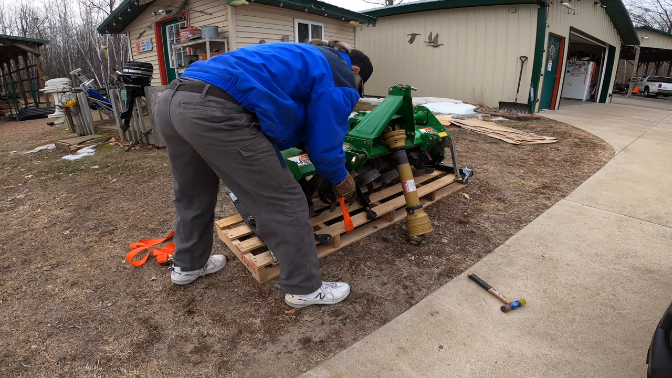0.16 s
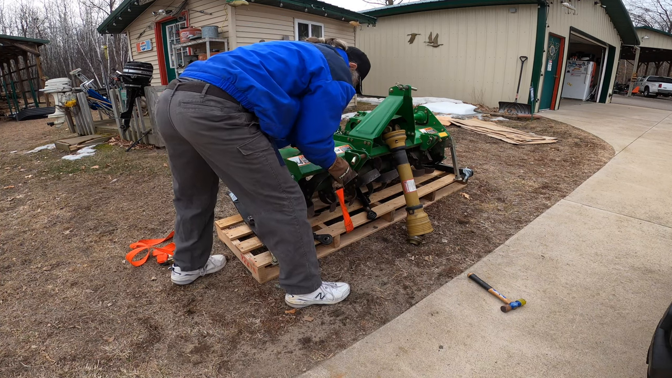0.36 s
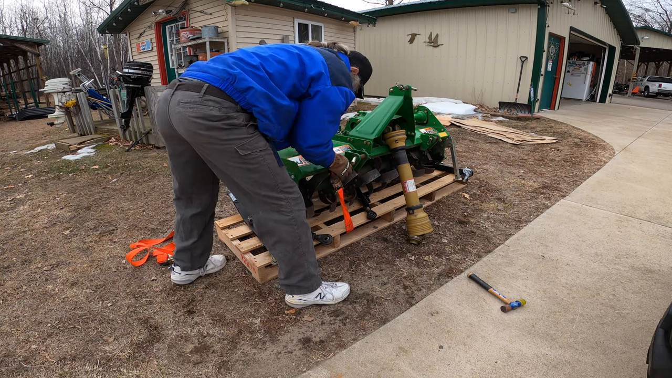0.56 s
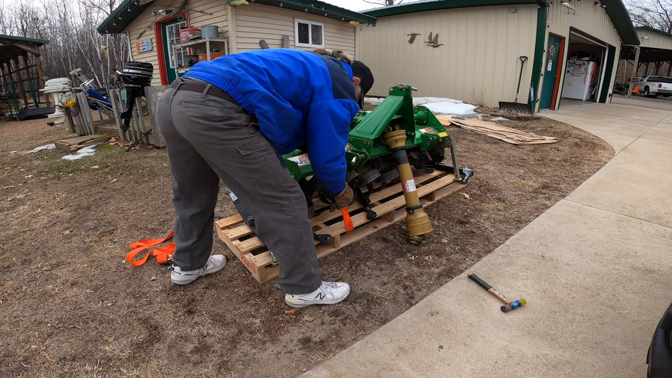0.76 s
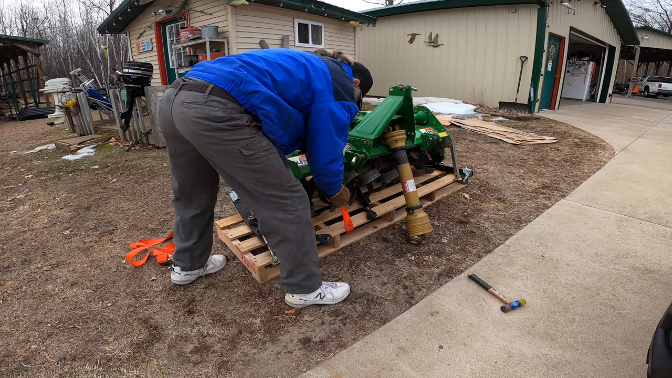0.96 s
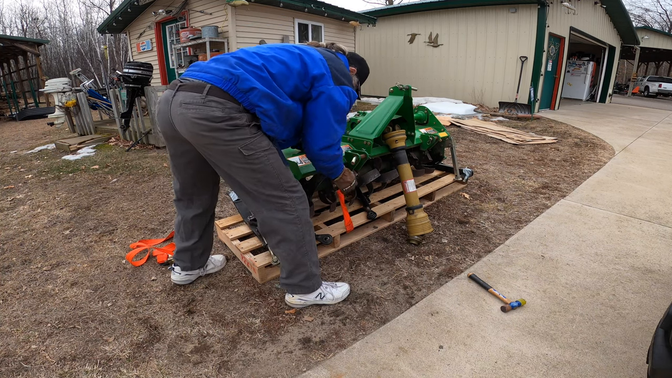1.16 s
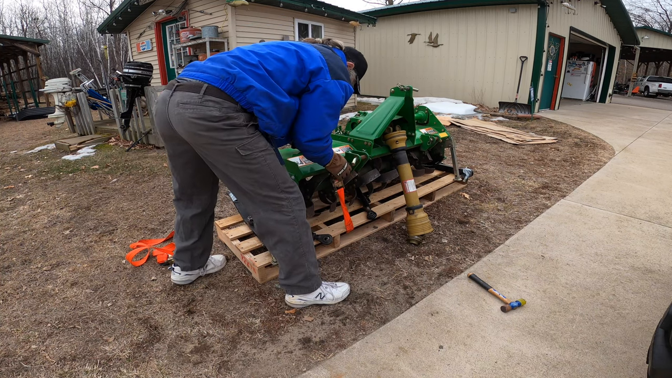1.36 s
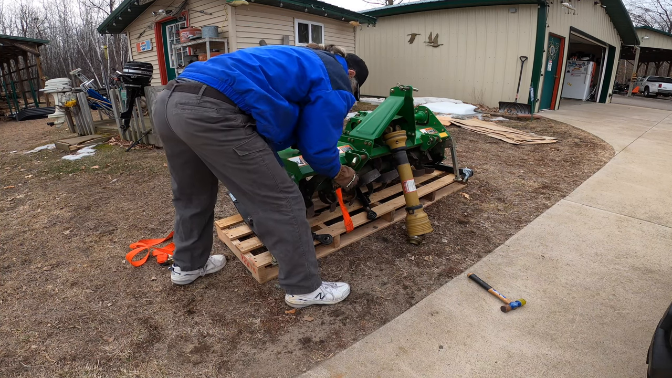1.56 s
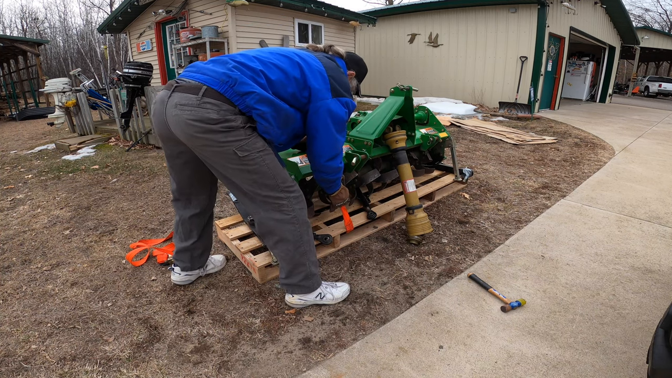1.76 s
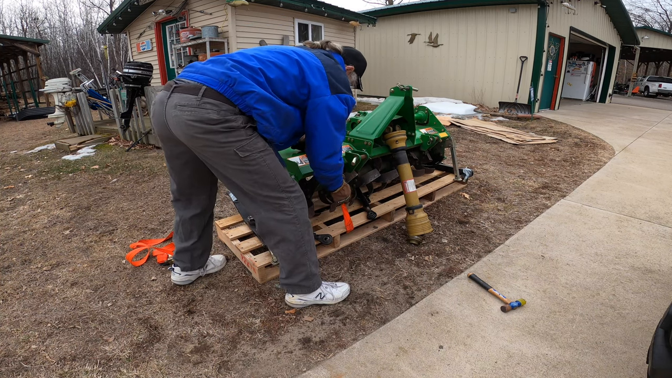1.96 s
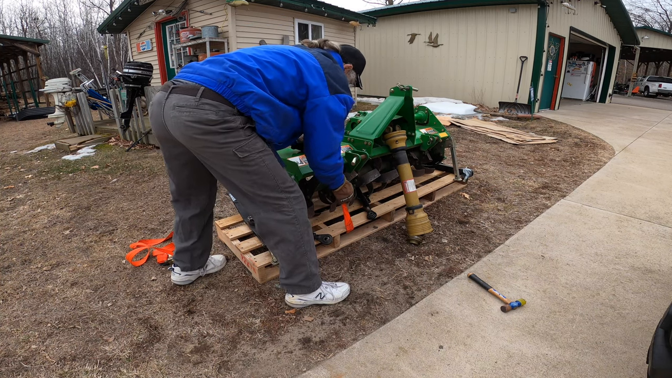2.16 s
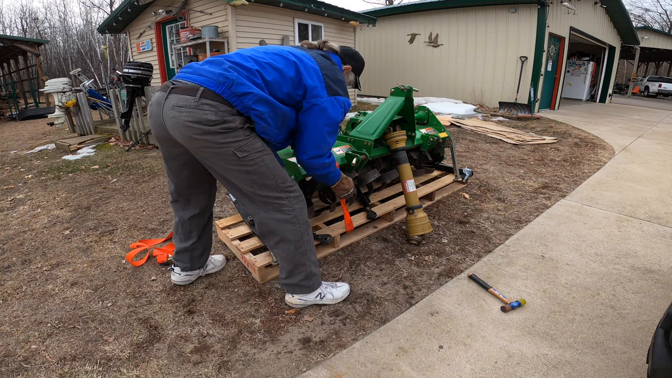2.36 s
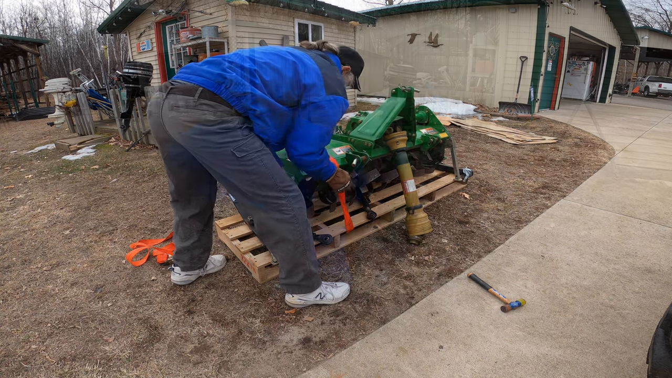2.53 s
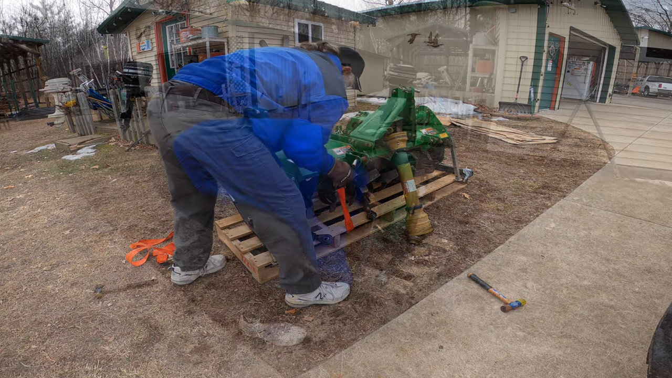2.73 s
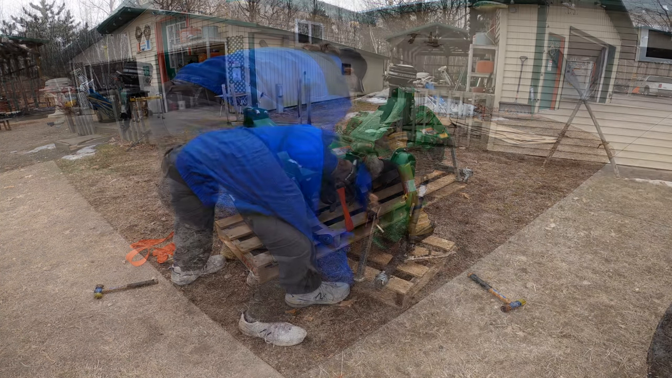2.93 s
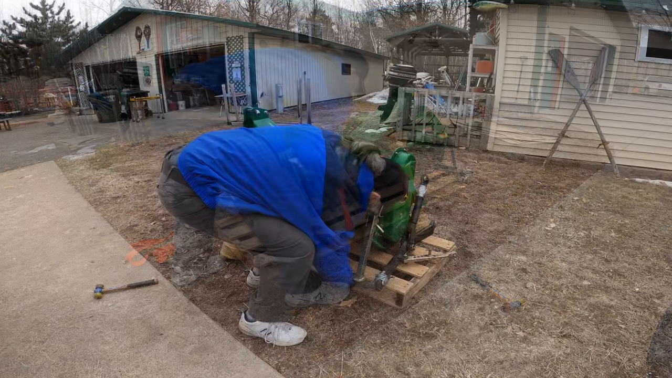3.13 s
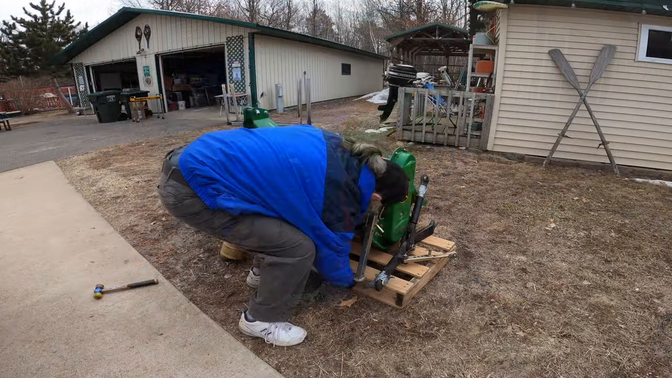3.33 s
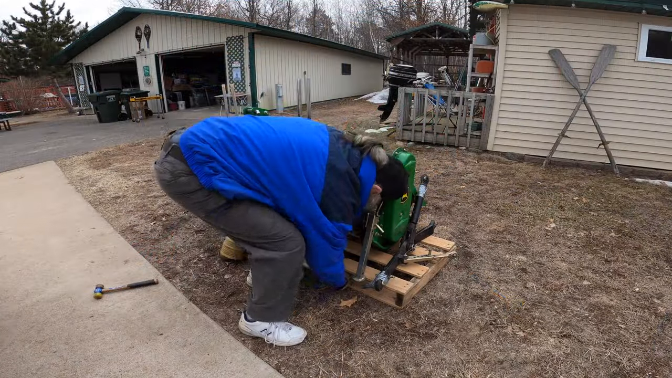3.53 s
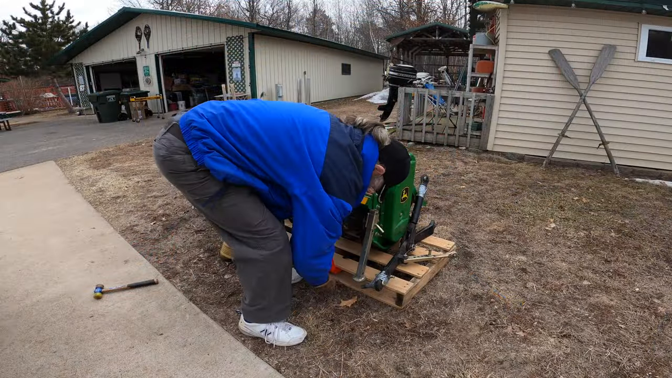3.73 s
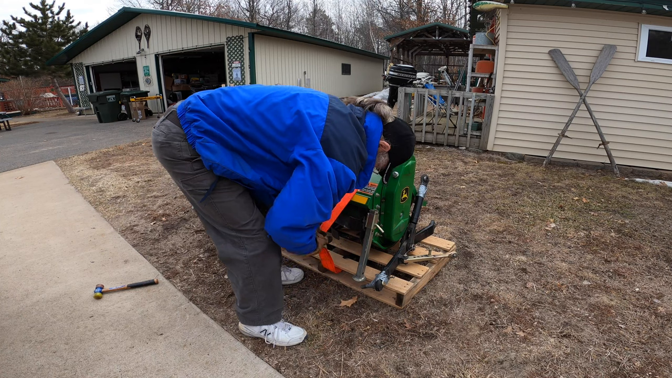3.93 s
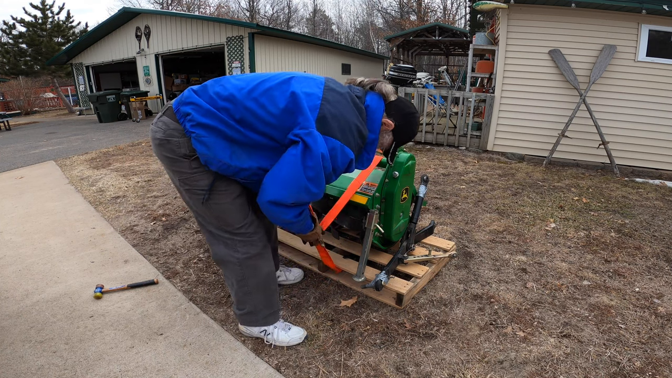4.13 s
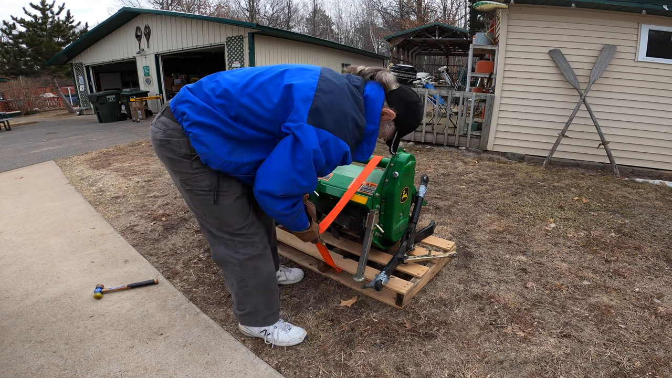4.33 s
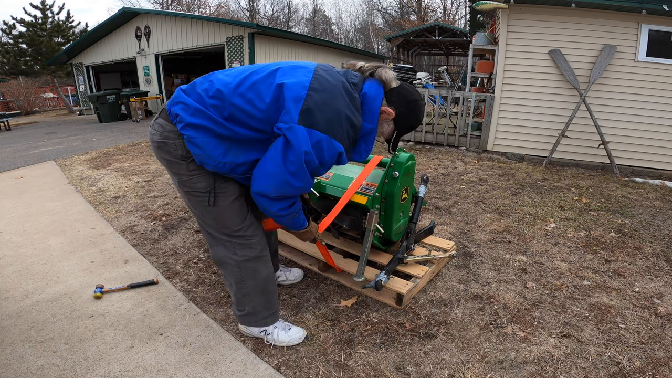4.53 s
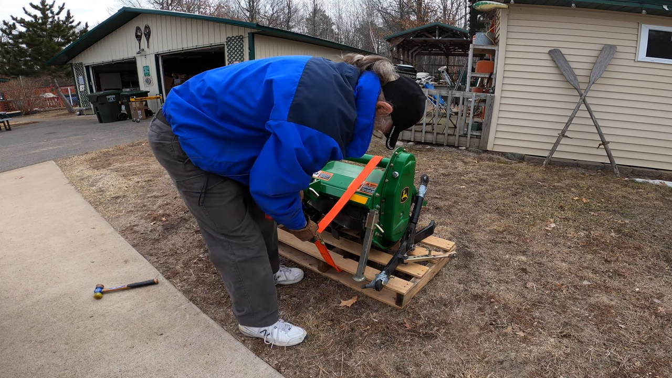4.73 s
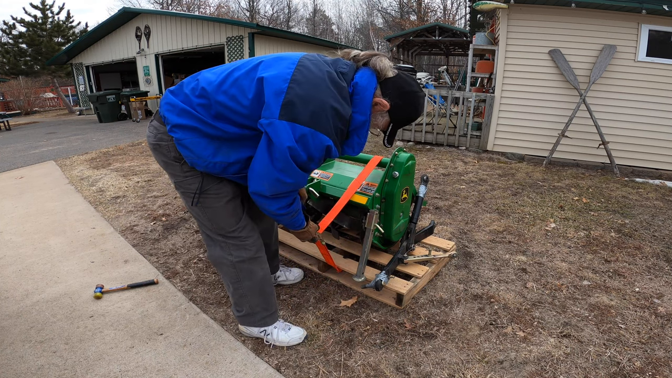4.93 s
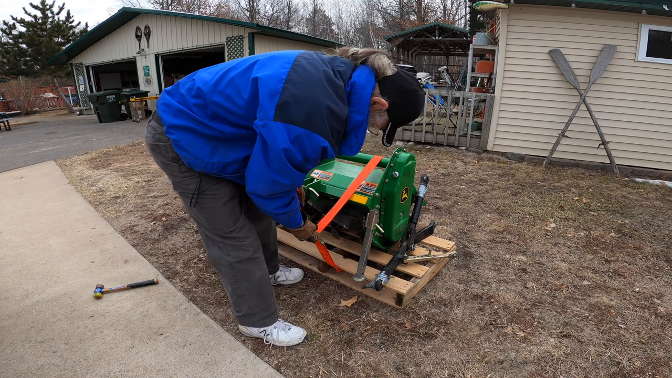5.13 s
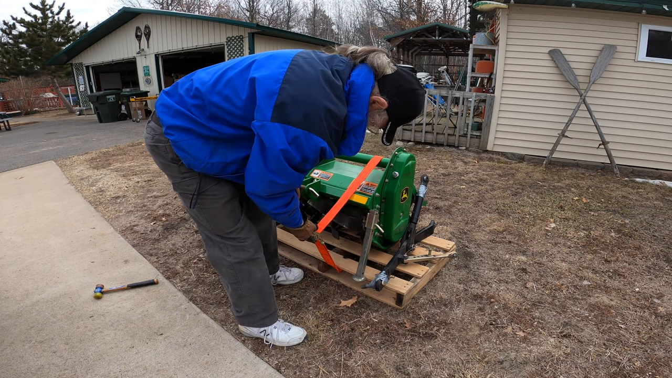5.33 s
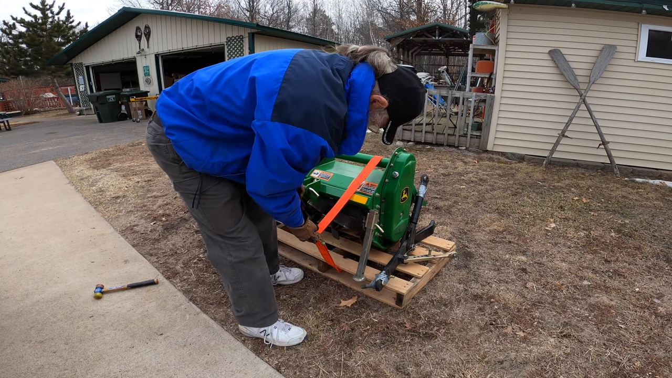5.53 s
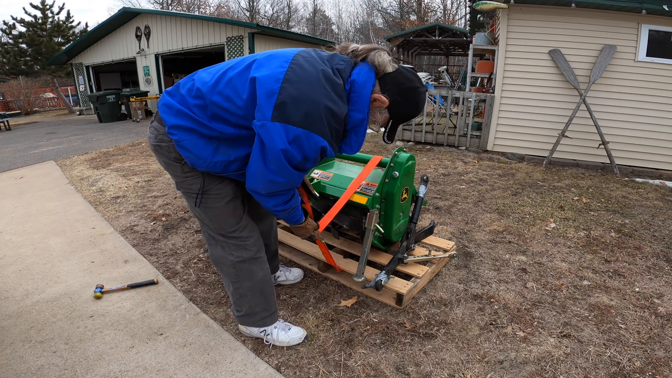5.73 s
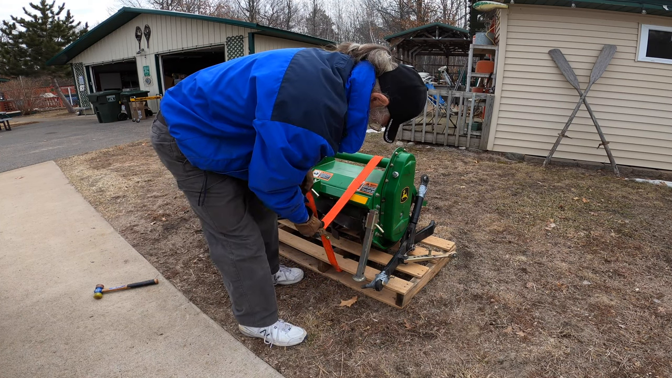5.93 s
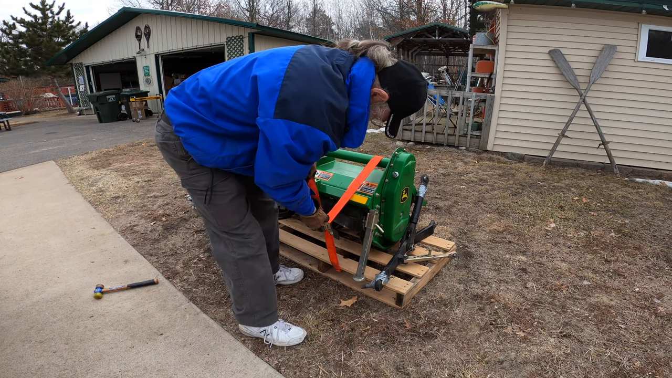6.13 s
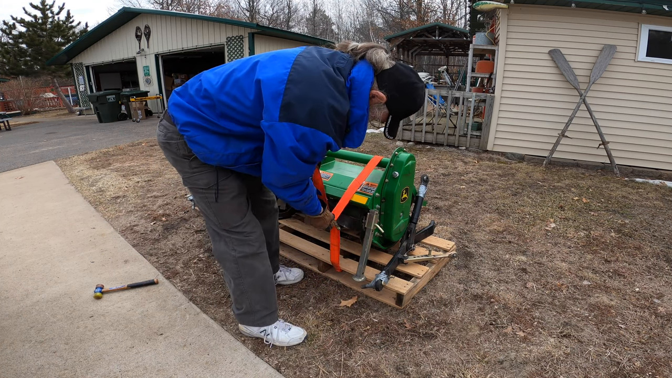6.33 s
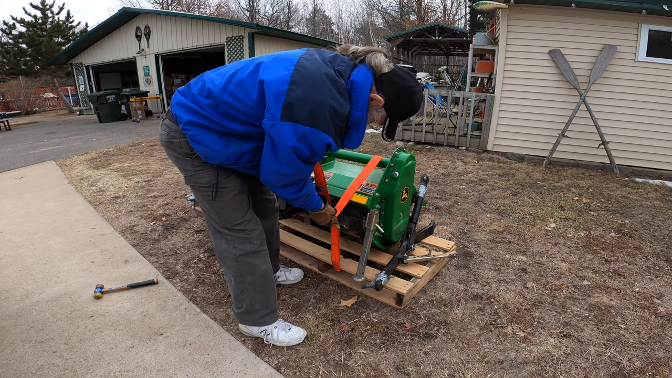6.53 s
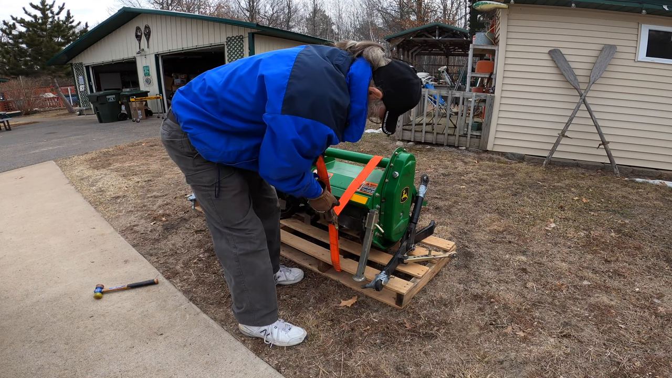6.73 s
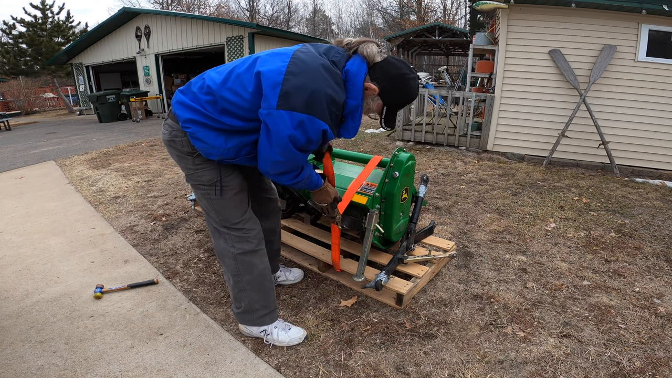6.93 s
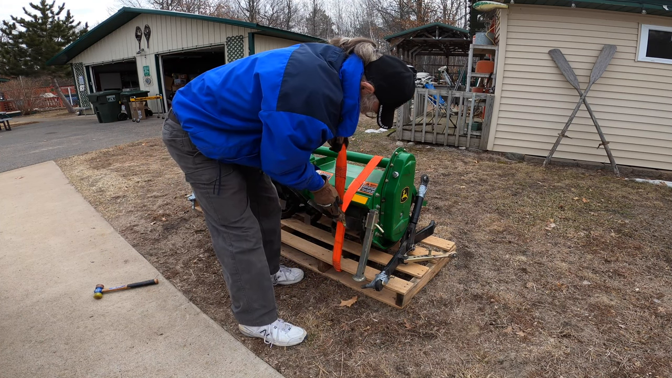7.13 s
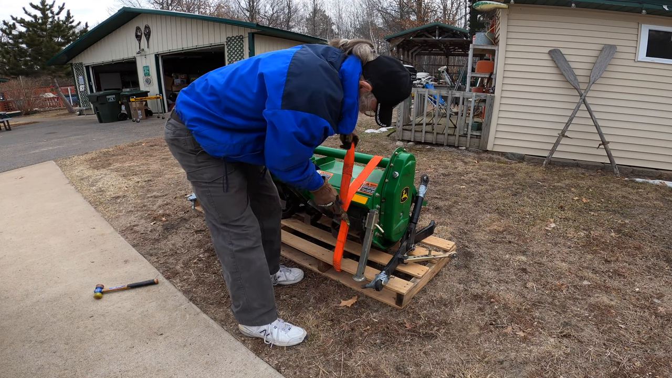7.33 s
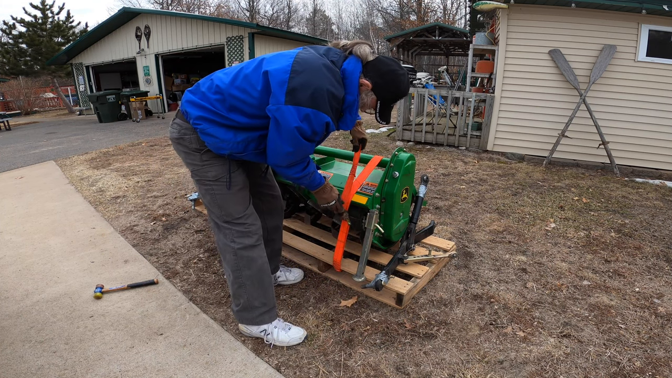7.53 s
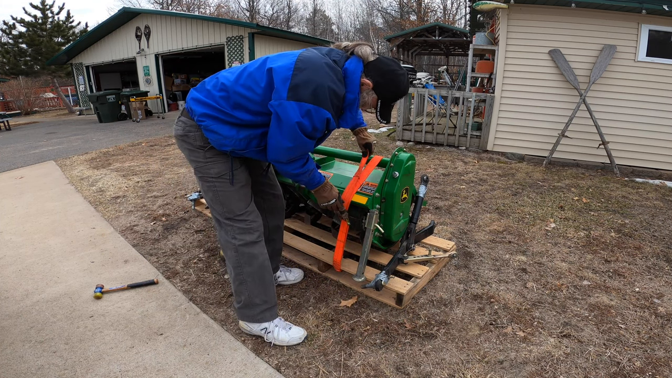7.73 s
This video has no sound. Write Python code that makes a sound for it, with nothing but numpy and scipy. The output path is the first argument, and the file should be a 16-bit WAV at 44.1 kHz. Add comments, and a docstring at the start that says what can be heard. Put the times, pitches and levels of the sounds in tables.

```python
"""Ratchet on a strap, outdoors

A steel ratchet is cranked: noise bursts ring body and pawl-spring modes, clinks ring the loose handle,
tick-modulated grit is the dragging pawl; decaying noise tails are the walls. Shaped noise makes wind buffets,
far engine drone, broad rush, hiss, jacket rustle and pallet knocks; gliding sines make engine notes, birdsong,
a low falling tone and a thin rough tone near the end. Stereo fades to mono just after 3 s, as the hiss stops."""
import sys
import numpy as np
from scipy import signal
from scipy.fft import rfft, irfft, next_fast_len
from scipy.io import wavfile
from scipy.ndimage import uniform_filter1d, map_coordinates

SR = 44100
rng = np.random.default_rng(int(sys.argv[2]) if len(sys.argv) > 2 else 0)


def unload_wav(signal):
    """Save mono or channel-first audio to the path in sys.argv[1] as 16-bit WAV at rate SR, clipped to [-1, 1]."""
    wavfile.write(
        sys.argv[1],
        SR,
        np.round(np.clip(np.atleast_2d(signal).T, -1, 1) * 32767).astype(np.int16),
    )


N = 343098
MONO_FROM_S = 3.043

# wind and engines over time: t/s, buffet level/dB, drone level/dB
WIND_AND_DRONE = [(0, -47.5, -58.5), (.5, -57, -63.5), (.62, -45.5, -52.5), (.95, -52.5, -63.5),
                  (1.41, -46.5, -54), (1.48, -49, -69), (1.6, -37, -58), (2.1, -73, -64), (2.8, -58, -60.5),
                  (3.5, -46.5, -52), (3.8, -42.5, -47), (4.25, -51.5, -53.5), (4.8, -47.5, -52),
                  (5.85, -51.5, -61.5), (6.37, -57, -59), (7.0, -54.5, -59), (7.78, -53, -54.5)]
# pawl snaps and scuffs: t/s, level/dB, treble/dB, bass/dB, burst t60/s
SNAPS = [(.0216, -36, -10, -4.5, 0.057), (.1562, -27.5, -7.5, -28, 0.029), (.1782, -15, -1.5, -6.5, 0.042),
         (.264, -35, -12, -2, .033), (.3069, -28, -8, -3, .017), (.3229, -13.5, -1, -8.5, 0.048),
         (.4087, -31, -2.5, -31, .09), (.4361, -13, -5.5, -8.5, 0.052), (.6853, -34.5, 2.5, -40, 0.062),
         (.6915, -31.5, -21, -23, .066), (.7659, -18.5, 0.5, -40, 0.04), (.8157, -15, -5, -18, 0.042),
         (1.0357, -35, -9.5, -5.5, 0.03), (1.0891, -31.5, -12, -14.5, 0.062),
         (1.1155, -22.5, -11, -8.5, 0.078), (1.2066, -34, -30, -0.5, 0.099), (1.2335, -23, -11, -19, 0.058),
         (1.2522, -12, -3, -14, 0.033), (1.3016, -24.5, -8, -2, .064), (1.3405, -25.5, -7, -21, 0.028),
         (1.3559, -9.5, -7, -20, 0.031), (1.5448, -29.5, -4.5, -15, .081), (1.553, -27.5, -27, -2, 0.13),
         (1.576, -34, -15, -1, 0.065), (1.6695, -38.5, -10, -10, 0.021), (1.709, -14.5, -6, -22, 0.044),
         (1.764, -13, -7, -24.5, 0.034), (1.8309, -19.5, -6.5, -15.5, 0.046),
         (2.3895, -31, -8, -37.5, 0.071), (2.416, -12, -9.5, -21.5, 0.034),
         (2.5495, -33.5, -15.5, -40, .028), (2.5665, -32.5, -9.5, -31, .052),
         (2.602, -10.5, -8.5, -14.5, 0.038), (2.8137, -35.5, -18, -35, .04), (2.849, -15, -9, -44, .019),
         (2.8555, -16.5, -13, -13.5, 0.018), (3.318, -49.5, 0, -2, 0.016)]
# ratchet body modes: f/Hz, level/dB, t60/s
BODY_MODES = [(360.8, -11, 0.19), (604, -14.5, 0.18), (761, -9.5, 0.11), (1050, 0, 0.047), (1632, -9, 0.08),
              (2100, -15.5, 0.084), (2430, -19.5, 0.091), (2740, -37, .03), (3070, -6, .035),
              (3415, -5, 0.07), (3520, 1.5, 0.025), (4070, -23, 0.12), (5010, -36.5, 0.034)]


def amp(db):
    """Decibels to gain."""
    return 10 ** (np.asarray(db) / 20)


def unit(x):
    """Scale to rms 1."""
    return x / np.sqrt(np.mean(x ** 2) + 1e-20)


def along(points, hz):
    """Interpolate (f/Hz, value) points on a log frequency axis."""
    f, v = np.transpose(points)
    return np.interp(np.log(hz + 1), np.log(f + 1), v)


def curves(rows):
    """One value per sample for each column after the time."""
    s, *cols = np.transpose(rows)
    return [np.interp(np.arange(N) / SR, s, c) for c in cols]


def wobble(knots_per_s):
    """Smooth random curve through normally distributed knots."""
    knots = rng.standard_normal(int(N * knots_per_s / SR) + 4)
    return map_coordinates(knots, [np.arange(N) * knots_per_s / SR])


def filtered(x, response):
    """Multiply the spectrum of x by a complex response of frequency."""
    m = next_fast_len(x.shape[-1] + 4096)
    spectrum = rfft(x, m) * response(np.fft.rfftfreq(m, 1 / SR))
    return irfft(spectrum, m)[..., :x.shape[-1]]


def swells(rows, sharp):
    """Gains of sine-arch gestures, powers summed, per level column of (start/s, length/s, level/dB, ..)."""
    s, length, *cols = np.transpose(rows)[..., None]
    progress = np.clip((np.arange(N) / SR - s) / length, 0, 1)
    arch_power = np.sin(np.pi * progress) ** (2 * sharp)
    return [np.sqrt(np.abs(np.sum(arch_power * amp(2 * db), axis=0))) for db in cols]


def rush(spectrum, side_db, patchy_db):
    """Noise, patchy in time and frequency: mid of rms 1, side of rms side_db."""
    z = signal.stft(rng.standard_normal((2, N)), nperseg=512)[2]
    patches = uniform_filter1d(rng.standard_normal(z.shape[1:]), size=6, axis=0)
    patches = unit(uniform_filter1d(patches, size=10, axis=1))
    pair = signal.istft(z * amp(patchy_db * patches), nperseg=512)[1][:, :N]
    mid, side = filtered(pair, lambda hz: amp(along(spectrum, hz)))
    return np.array([unit(mid), amp(side_db) * unit(side)])


def grit(spectrum, scatter_db):
    """Dense tiny ticks of uneven size, coloured; rms 1."""
    ticks = rng.standard_normal(N) * amp(scatter_db * wobble(900))
    return unit(filtered(ticks, lambda hz: amp(along(spectrum, hz))))


def arcs(rows, ends_db):
    """Note rows to (t/s, f/Hz, level/dB) tables: parabolic pitch, level ends_db at both ends re middle."""
    u = np.linspace(-1, 1, num=9)
    notes = []
    for s, length, first, mid, last, db in rows:
        hz = mid + (last - first) / 2 * u + ((first + last) / 2 - mid) * u * u
        notes.append(np.transpose([s + length * (u + 1) / 2, hz, db + ends_db * u * u]))
    return notes


def whistle(notes, jitter, flutter_db, edge_s):
    """Gliding sines with unsteady pitch and level, each fading in and out over edge_s."""
    out, shake, flutter = np.zeros(N), wobble(1 / edge_s), wobble(0.73 / edge_s)
    for note in notes:
        s, hz, db = np.transpose(note)
        i = np.arange(round(s[0] * SR), min(round(s[-1] * SR), N))
        t = i / SR
        fade = np.clip(np.minimum(t - s[0], s[-1] - t) / edge_s, 0, 1)
        phase = 2 * np.pi * np.cumsum(np.interp(t, s, hz) * (1 + jitter * shake[i])) / SR
        level = amp(np.interp(t, s, db) + flutter_db * flutter[i])
        out[i] += np.sqrt(2) * fade * level * np.sin(phase)
    return out


def walls(x, delay_s, slap_db):
    """Two diffuse answers with frequency-dependent decay and a later lump from the far wall."""
    # wall decay: f/Hz, t60/s
    decay = [(250, 0.39), (1500, 0.22), (4000, 0.22), (9000, 0.13), (15000, 0.16)]
    hz, t, z = signal.stft(rng.standard_normal((2, SR // 3)), SR, nperseg=256)
    lump = 1 + amp(slap_db) * np.exp(-((t - .045) / .018) ** 2)
    fall = amp(-60 * t / along(decay, hz)[:, None])
    tail = signal.istft(z * lump * fall, SR, nperseg=256)[1]
    tail = np.pad(tail / np.linalg.norm(tail[0]), [(0, 0), (round(abs(delay_s) * SR), 0)])
    return signal.fftconvolve(x[None], tail, axes=1)


def wind():
    """Turbulence at the microphone: low noise with gusts, differing from port to port; mid and side."""
    # buffet spectrum: f/Hz, level/dB
    buffet_spectrum = [(7.1, -31.5), (12, 4), (32, 2), (69, 3), (200, -26.5), (260, -50), (440, -120)]
    # puffs on the ports: start/s, length/s, level/dB
    gusts = [(.02, 0.16, -40), (.39, 0.13, -51), (.58, 0.087, -35), (.68, 0.18, -46), (1.33, 0.088, -38.5),
             (1.53, 0.13, -35.5), (2.24, 0.074, -49), (2.72, 0.095, -48.5), (3.62, 0.19, -35),
             (3.8, 0.39, -43.5), (4.4, 0.16, -45), (4.93, 0.15, -37.5), (5.35, 0.33, -46.5),
             (6.0, 0.054, -40), (6.09, .1, -41)]
    buffet = amp(curves(WIND_AND_DRONE)[0])  # slowly varying buffet level
    gain = np.hypot(buffet, swells(gusts, sharp=1.1)[0]) * amp(1.5 * wobble(14))
    return gain * rush(buffet_spectrum, side_db=2.5, patchy_db=.8)


def engine_drone():
    """Far engines merged into low, nearly mono noise; mid and side."""
    # drone spectrum: f/Hz, level/dB
    drone_spectrum = [(70, -17), (120, 7), (170, 6.5), (230, 0), (300, -25), (500, -43.5)]
    return amp(curves(WIND_AND_DRONE)[1]) * rush(drone_spectrum, side_db=-18.0, patchy_db=1.5)


def broad_rush():
    """Broad shaped noise: outdoor rush, swelling with the ratchet's diffuse wash; mid and side."""
    # level over time: t/s, level/dB
    rush_level = [(0, -60), (.35, -62), (.55, -61), (1.08, -64.5), (1.23, -55), (1.71, -54.5), (2.3, -70),
                  (2.58, -56.5), (2.95, -64.5), (3.83, -56.5), (5.0, -64), (6.76, -64), (6.96, -62),
                  (7.78, -62.5)]
    # rush spectrum: f/Hz, level/dB
    rush_spectrum = [(150, -7.5), (250, 0.5), (469, -7), (703, -7), (868, -12), (1050, -8.5), (2070, -8.5),
                     (2880, -9.5), (4650, -15.5), (7860, -22), (9000, -21), (11700, -53), (19800, -120)]
    return amp(curves(rush_level)[0]) * rush(rush_spectrum, side_db=-9, patchy_db=1.3)


def treble_hiss():
    """Faint wide treble noise that stops where the sound turns mono; mid and side."""
    # hiss spectrum: f/Hz, level/dB
    hiss_spectrum = [(3000, -10), (7000, 7), (10000, -7.5), (13000, -15.5), (15000, -42)]
    gate = np.arange(N) < MONO_FROM_S * SR
    return amp(-72) * gate * rush(hiss_spectrum, side_db=3.5, patchy_db=2.5)


def ports(hz):
    """Level and phase of the ratchet at the left and right port."""
    # level difference: f/Hz, left minus right/dB
    lean = [(150, 0), (700, -2.5), (1300, -2.5), (2400, -.5), (4400, -2), (8100, -2), (12000, -6),
            (15000, -9)]
    # phase difference: f/Hz, left lag/rad
    lag = [(300, .05), (3700, .9), (5500, 1.25), (9000, 1.6), (15000, 1.6)]
    side = np.array([[1], [-1]]) / 2
    return amp(along(lean, hz) * side) * np.exp(-1j * along(lag, hz) * side)


def ticking():
    """Gain of the dragging: judder plus sharp random ticks of loose parts; rms 1."""
    ticks_per_s, tick_db, tick_t60_s = 110, -0.5, 0.039  # level before rms scaling
    ticks = (rng.random(N) < ticks_per_s / SR) * rng.exponential(size=N) * amp(tick_db)
    fall = amp(-60 * np.arange(SR // 20) / SR / tick_t60_s)
    return unit(amp(1.4 * wobble(120)) + signal.fftconvolve(ticks, fall)[:N])


def pawl_drag():
    """The pawl grinds on the teeth around and between the snaps and wakes the body modes; mono."""
    # handle strokes: start/s, length/s, body level/dB, treble level/dB
    strokes = [(0, 0.52, -53, -66.5), (.24, 0.16, -42.5, -57), (.38, 0.12, -44.5, -61.5),
               (.68, 0.24, -47, -57), (1.02, 0.19, -46, -50.5), (1.2, 0.25, -36, -52),
               (1.52, 0.42, -49.5, -63.5), (2.24, 0.13, -54.5, -71), (2.39, 0.17, -41, -66.5),
               (2.56, 0.17, -42.5, -74), (2.85, 0.19, -58.5, -77)]
    body_gain, treble_gain = swells(strokes, sharp=0.91)
    judder = ticking()
    body_spectrum = [(250, -13), (700, -8.5), (1650, 1.5), (2600, -4.0), (3400, -9.0), (5500, -14.5),
                     (8000, -40)]
    treble_spectrum = [(4000, -15), (6000, 2.5), (7800, 2.5), (9500, -11.5), (13000, -16.5), (15500, -45.5)]

    def steel(f):
        resonances = sum(1j * f * 110 / (hz * hz - f * f + 1j * f * 110) for hz, _, _ in BODY_MODES)
        return amp(-9) + resonances  # direct path plus modes 110 Hz wide

    body = filtered(body_gain * grit(body_spectrum, scatter_db=0.5), steel)
    treble = treble_gain * grit(treble_spectrum, scatter_db=2.0)
    return judder * (body + treble)


def snap(t, db, treble_db, bass_db, t60_s):
    """Lumpy steel-on-steel chatter that cracks and rings body and pawl spring."""
    # crack spectrum: f/Hz, level/dB
    crack_spectrum = [(120, -43.5), (200, -55.5), (821, 4), (1620, 4.5), (2210, 2.5), (3760, 5.5),
                      (6050, -2), (6400, -12.5), (7970, -30.5), (9580, -21.5), (15100, -28.5), (16000, -55)]
    # pawl spring modes: f/Hz, level/dB, t60/s
    spring_modes = [(7060, -8, 0.028), (7740, 13, 0.0096), (8420, -3, 0.039), (8290, -3, 0.022)]
    rise_s = 0.0035
    shape = np.minimum(t / rise_s, 1) ** 2 * amp(-60 * np.maximum(t - rise_s, 0) / t60_s)
    lumps_db = 3 * rng.standard_normal(len(t) // 40 + 1).repeat(40)[:len(t)]  # about 1 ms each
    chatter = shape * amp(lumps_db)

    tilt = [(900, bass_db + 1.0), (1500, 0), (5500, 0), (7000, treble_db + 15)]
    crack = filtered(chatter * rng.standard_normal(len(t)),
                     lambda hz: amp(along(crack_spectrum, hz) + along(tilt, hz)))
    crack *= np.linalg.norm(shape) / np.linalg.norm(crack)

    modes = [(hz, g + (bass_db + 5.0) * (hz < 1200), d) for hz, g, d in BODY_MODES]
    modes += [(hz, g + treble_db + 2.5, d) for hz, g, d in spring_modes]
    ring = 0
    for hz, g, d in modes:  # random mode levels and pitches at each snap
        fall = amp(g + rng.normal(0, 3.5) - 60 * t / d)
        ring = ring + fall * np.sin(2 * np.pi * hz * (1 + .03 * rng.normal()) * t)
    push = (chatter * rng.standard_normal(len(t)))[:SR // 40]  # the chatter drives the modes
    rung = signal.fftconvolve(ring, push / np.linalg.norm(push))[:len(t)]
    return amp(db) * (amp(-5.5) * crack + amp(-13.0) * rung)


def clink(t, db, hz, upper_db, t60_s):
    """Soft contact of the loose handle: an unsteady ring with upper modes."""
    # upper modes: multiple of base f, level/dB before upper_db and scatter
    upper_modes = [(1.49, -0.5), (1.58, 0), (1.97, -3.5), (3.468, -13)]
    modes = [(0.99, 0)]
    modes += [(k * (1 + 0.021 * rng.normal()), g + upper_db + rng.normal(0, 3.5)) for k, g in upper_modes]
    drift = np.cumsum(rng.standard_normal((len(modes), len(t))), axis=1) * .045
    # random phase drift roughens the ring
    ring = sum(amp(g) * np.sin(2 * np.pi * hz * k * t + np.sqrt(k) * d) for (k, g), d in zip(modes, drift))
    rattle = amp(1.8 * uniform_filter1d(rng.standard_normal(len(t)), size=100) * np.sqrt(100))
    return amp(db - 60 * t / t60_s) * (1 - np.exp(-t / .0015)) * rattle * ring


def damped(s, t):
    """Gain of a clink begun at s: the next snap above -20 dB grips the handle, t60 30 ms."""
    stop = min([c - s for c, db, *_ in SNAPS if db > -20 and c > s + .008] + [1])
    return amp(-60 * np.maximum(t - stop, 0) / .03)


def ratchet_contacts():
    """Snaps and clinks reach both ports directly and off the walls; left and right."""
    # handle clinks: t/s, level/dB, base f/Hz, upper modes level/dB, t60/s
    clinks = [(.08, -31, 1643, -35, 0.05), (0.1039, -29.5, 1638, -40, 0.089),
              (0.1228, -34, 1610, -10, .052), (.1523, -34, 1604, -10, 0.13), (0.1638, -24, 1594, -27, 0.12),
              (0.2663, -28, 1612, -29, .078), (0.2892, -31, 1617, -16, 0.1), (.313, -25.5, 1694, -12, 0.16),
              (0.3436, -29.5, 1590, -5.5, .057), (0.3625, -25, 1610, -10, 0.038),
              (0.409, -37.5, 1597, -4, 0.17), (1.0889, -34.5, 1620, -23, 0.11),
              (1.1878, -21, 1650, -16, 0.037), (1.2058, -31.5, 1546, -6, 0.065),
              (1.2362, -32, 1616, -4, .098), (1.3, -24, 1870, -5, .07), (2.2971, -37, 1760, -8, 0.093),
              (2.389, -40, 1705, -5, 0.48), (2.4191, -7, 1622, -14, 0.024), (2.467, -34.5, 1800, -13, 0.21),
              (2.5513, -27, 1740, -7.5, 0.13), (2.664, -30, 1705, -8, 0.06),
              (2.7253, -35.5, 1740, -5, 0.084), (2.821, -44, 1401, -12, 0.21)]
    out, t = np.zeros((2, N + SR)), np.arange(SR // 6) / SR
    hits = [(s, snap(t, *row)) for s, *row in SNAPS]
    hits += [(s, damped(s, t) * clink(t, *row)) for s, *row in clinks]
    spread = [(500, .2), (3000, 0.44), (8000, .9)]  # f/Hz, side gain of the echo
    for s, hit in hits:
        echo = amp(-14.5) * walls(hit, delay_s=0.0084, slap_db=-5)
        echo_side = filtered(echo[1], lambda hz: along(spread, hz))
        i = round(s * SR)
        out[:, i:i + len(t)] += filtered(hit, ports)
        out[:, i:i + echo.shape[1]] += 0.63 * echo[0] + echo_side * [[1], [-1]]
    return out[:, :N]


def pallet_thumps():
    """Dull knocks on the pallet: decaying low noise bursts with no ring."""
    # knocks: t/s, level/dB, t60/s
    knocks = [(0.328, -46, .066), (2.424, -35.5, 0.28), (2.462, -47, 0.064), (2.607, -48, 0.038),
              (2.66, -31, 0.079), (3.29, -46, 0.19), (3.761, -51, 0.33), (3.962, -33.5, 0.031),
              (6.861, -47.5, .11)]
    spectrum = [(200, -7), (330, 16.5), (700, 7.5), (1500, -25)]
    out, t = np.zeros(N + SR), np.arange(SR // 4) / SR
    for s, db, t60_s in knocks:
        puff = unit(filtered(rng.standard_normal(len(t)), lambda hz: amp(along(spectrum, hz))))
        out[round(s * SR):][:len(t)] += amp(db - 60 * t / t60_s) * (1 - np.exp(-t / 0.012)) * puff
    return out[:N]


def pivot_squeal():
    """The pivot squeals as grit in a narrow band; mono."""
    # squeals: start/s, length/s, level/dB
    squeals = [(1.64, 0.227, -38), (1.97, 0.37, -84)]
    spectrum = [(7400, -47.5), (8200, -6.5), (8500, -4), (8900, -10), (9700, -52)]
    return swells(squeals, sharp=0.93)[0] * grit(spectrum, scatter_db=-0.5)


def distant_birds(count):
    """Random short glides of faint birds further off, as note tables."""
    # level over time: t/s, level/dB
    far_birds_level = [(2.9, -66), (4.5, -62), (5.3, -72), (6, -63), (7.2, -62), (7.78, -59)]
    # start/s, f/Hz, bend/octaves, length/s, level offset/dB
    rows = rng.random((count, 5)) * [4.75, 1800, .45, .03, 7] + [2.95, 2300, -.3, .015, -11]
    notes = []
    for s, hz, bend, length, size_db in rows:
        db = np.interp(s, *np.transpose(far_birds_level)) + size_db
        notes.append([(s, hz, db), (s + length, hz * 2 ** bend, db)])
    return notes


def birds():
    """Warbled, slightly hoarse gliding notes, smeared by the trees and walls around; mono."""
    # two or three birds overlapping: start/s, length/s, first f/Hz, middle f/Hz, last f/Hz, level/dB
    song_notes = [(2.95, 0.066, 2500, 2720, 2880, -60.5), (3.04, .06, 3400, 3140, 3120, -60.5),
                  (3.11, .03, 4350, 4290, 4160, -71), (3.12, 0.058, 3300, 3050, 2920, -60),
                  (3.21, 0.062, 3220, 3500, 3740, -58.5), (3.28, .15, 9100, 7900, 7300, -78),
                  (3.287, 0.076, 4450, 3300, 2390, -54.5), (3.37, 0.038, 2650, 2584, 3250, -65),
                  (3.4, .03, 3140, 3350, 3730, -53.5), (3.43, 0.051, 3630, 3620, 3600, -54.5),
                  (3.52, .05, 3630, 3620, 3600, -60), (3.47, .05, 2570, 2680, 2740, -67),
                  (3.56, 0.068, 2760, 3190, 3610, -51.5), (3.627, 0.037, 3610, 3250, 3190, -55),
                  (3.7, .05, 2810, 2755, 2500, -61.5), (3.77, 0.085, 2730, 2975, 3290, -55.5),
                  (3.92, 0.043, 3850, 3840, 3850, -60), (3.96, .04, 3870, 3530, 3030, -58),
                  (4.1, 0.092, 2160, 2610, 3260, -56), (4.22, 0.12, 3870, 3700, 3500, -59.5),
                  (4.36, .05, 2540, 2760, 2910, -61), (4.41, 0.027, 3330, 3450, 3400, -54.5),
                  (4.42, 0.039, 3620, 3900, 4680, -61), (4.55, 0.045, 2350, 3300, 4020, -56),
                  (4.594, 0.052, 3800, 2900, 2000, -58), (4.68, 0.071, 3050, 3230, 3420, -60),
                  (4.732, 0.033, 3440, 3040, 2830, -56.5), (4.91, .04, 5210, 5180, 5080, -68),
                  (4.97, 0.11, 3860, 4010, 3480, -67.5), (5.067, 0.061, 3510, 3420, 2900, -65.5),
                  (5.36, 0.1, 5480, 4900, 4300, -69.5), (5.48, 0.052, 3880, 3930, 3940, -65),
                  (5.575, 0.048, 2700, 2994, 3210, -57.5), (5.67, 0.035, 3850, 4350, 4500, -65.5),
                  (5.7, 0.041, 4510, 3900, 3360, -57), (5.756, 0.042, 3375, 3580, 3400, -59.5),
                  (5.82, 0.03, 3120, 3086, 3050, -53), (5.835, .05, 2010, 1993, 2040, -69.5),
                  (5.89, 0.063, 3470, 3370, 2260, -53.5), (6.04, 0.05, 2630, 2850, 3400, -61),
                  (6.11, 0.042, 3590, 3480, 3270, -55.5), (6.15, 0.036, 3410, 2950, 2500, -54.5),
                  (6.195, 0.052, 2800, 2890, 3140, -61), (6.27, 0.064, 2965, 2830, 2420, -58.5),
                  (6.44, .11, 1820, 2470, 2900, -64.5), (6.47, 0.051, 3640, 3570, 3550, -60),
                  (6.515, 0.03, 3970, 4060, 4034, -61), (6.58, 0.12, 4140, 3423, 2730, -54.5),
                  (6.68, .045, 2780, 2920, 3000, -50.5), (6.83, 0.058, 3440, 3584, 3650, -60.5),
                  (6.89, 0.048, 2750, 2810, 2910, -52), (7.07, 0.061, 2930, 3150, 3250, -58.5),
                  (7.12, 0.12, 3260, 2620, 2240, -60.5), (7.12, 0.042, 3830, 3690, 3500, -58),
                  (7.265, 0.054, 4110, 3606, 3350, -57), (7.36, .035, 4700, 4420, 4100, -57.5),
                  (7.36, 0.072, 2390, 2380, 2500, -59), (7.42, .09, 3590, 3060, 2620, -57),
                  (7.53, .07, 2820, 2760, 2690, -64.5), (7.62, 0.087, 3150, 3050, 2967, -60),
                  (7.71, 0.054, 4500, 3950, 3600, -66)]
    notes = arcs(song_notes, ends_db=-3.5) + distant_birds(count=220)
    song = whistle(notes, jitter=.011, flutter_db=3.5, edge_s=.005)
    song *= 1 + .45 * wobble(500)  # hoarseness
    return song + amp(-5) * walls(song, delay_s=0.0071, slap_db=-27)[0, :N]


def jacket():
    """Nylon jacket and strap swish: swelling, unsteady grit; mono."""
    # swishes: start/s, length/s, level/dB
    swishes = [(2.95, 0.3, -68), (3.29, 0.05, -56.5), (3.42, 0.34, -58), (3.78, 0.23, -52), (3.95, .2, -58),
               (4.1, 0.94, -62.5), (5.3, 0.2, -65.5), (5.65, 0.078, -63.5), (5.9, .2, -59),
               (6.1, 0.45, -56.5), (6.53, 0.16, -60.5), (6.73, 0.36, -57), (7.0, 0.41, -60),
               (7.56, 0.53, -63.5)]
    # nylon spectrum: f/Hz, level/dB
    nylon_spectrum = [(500, -31), (1100, -1.5), (2500, 0), (4500, -6.5), (6500, -15.5), (8500, -12),
                      (10000, -23), (13000, -30), (14500, -52)]
    gain = swells(swishes, sharp=0.65)[0] * amp(1.15 * wobble(12))
    return gain * grit(nylon_spectrum, scatter_db=1.0)


def engine_notes():
    """Engine notes that stand out of the drone, as unsteady low sines; mono."""
    # notes: start/s, length/s, first f/Hz, middle f/Hz, last f/Hz, level/dB
    engine_rows = [(3.1, 0.54, 188, 188, 183, -56.5), (6.15, .75, 129, 139, 150, -54.5),
                   (6.92, .86, 59.8, 61, 62, -51.5)]
    return whistle(arcs(engine_rows, ends_db=-3.5), jitter=0.023, flutter_db=1.5, edge_s=.08)


def falling_tone():
    """Short low falling tone, one unsteady sine; mono."""
    # note: start/s, length/s, first f/Hz, middle f/Hz, last f/Hz, level/dB
    falling_rows = [(6.845, 0.061, 333, 270, 205, -55.5)]
    return whistle(arcs(falling_rows, ends_db=-4), jitter=.02, flutter_db=1, edge_s=.01)


def rough_tone():
    """Thin tone of two partials, roughened by fast random level changes; mono."""
    # notes: start/s, length/s, first f/Hz, middle f/Hz, last f/Hz, octave partial level/dB
    rough_rows = [(6.9, .18, 822, 832, 855, -60), (7.07, .1, 855, 860, 860, -65),
                  (7.2, .11, 880, 862, 860, -62.5)]
    # partials: multiple of f, level/dB
    partials = [(1, -8), (2, 0)]
    notes = arcs(rough_rows, ends_db=-4)
    stack = [n * [1, k, 1] + [0, 0, db] for n in notes for k, db in partials]
    return whistle(stack, jitter=.012, flutter_db=2.5, edge_s=.012) * (1 + .5 * wobble(300))


def scene():
    """Sum of all sources; the side signal fades out, leaving mono."""
    side_gain, side_fade_s = 0.94, 0.16
    mid, side = wind() + engine_drone() + broad_rush() + treble_hiss()
    left, right = ratchet_contacts() + filtered(pawl_drag() + pivot_squeal(), ports)
    mid += (left + right) / 2
    side += (left - right) / 2
    mid += pallet_thumps() + birds() + jacket() + engine_notes() + falling_tone() + rough_tone()
    side *= side_gain * np.clip((MONO_FROM_S - np.arange(N) / SR) / side_fade_s, 0, 1)
    return np.array([mid + side, mid - side])


def record(dry):
    """The microphone loses the highest treble; nothing is kept from 16.1 kHz up."""
    return filtered(dry, lambda hz: amp(along([(14000, 0), (15500, -17.0)], hz)) * (hz < 16100))


dry = scene()
out = record(dry)
unload_wav(out)
```